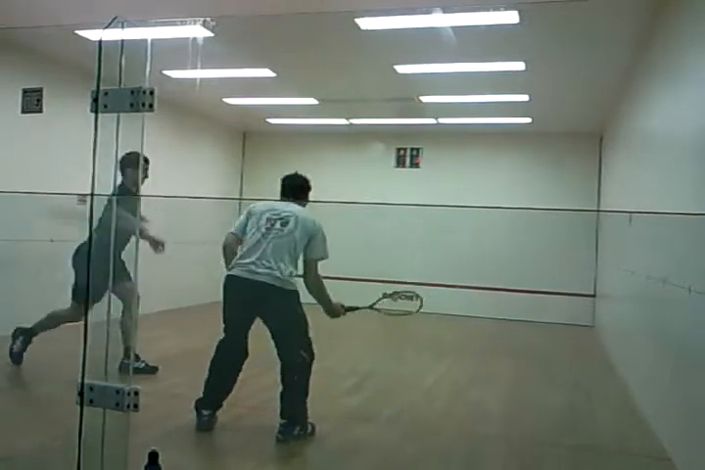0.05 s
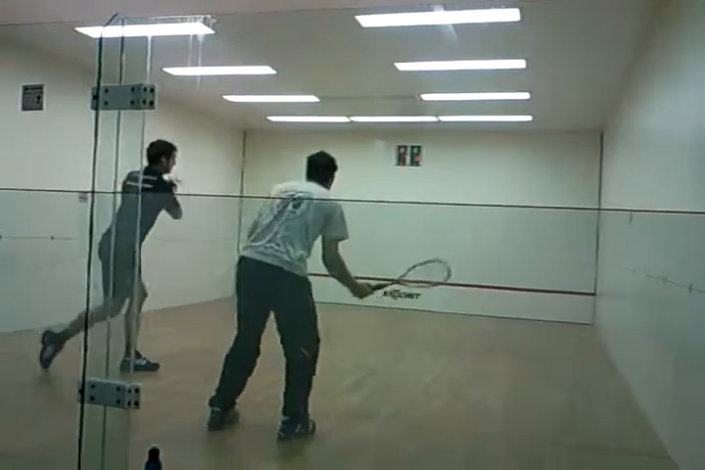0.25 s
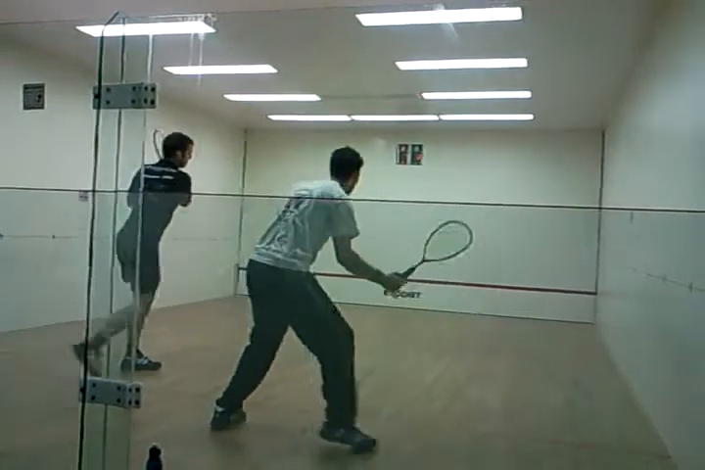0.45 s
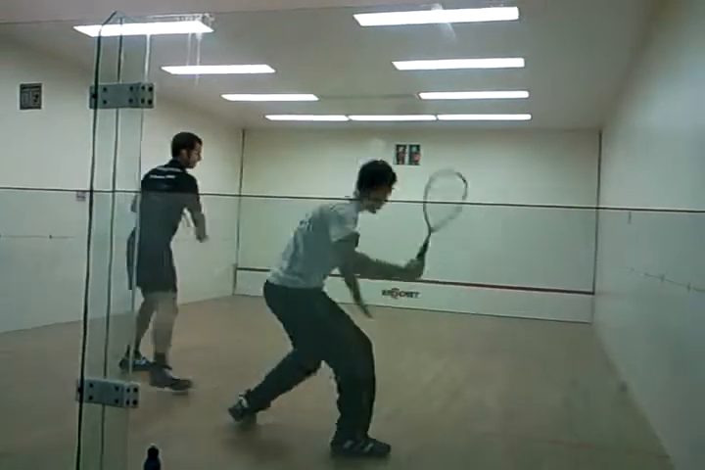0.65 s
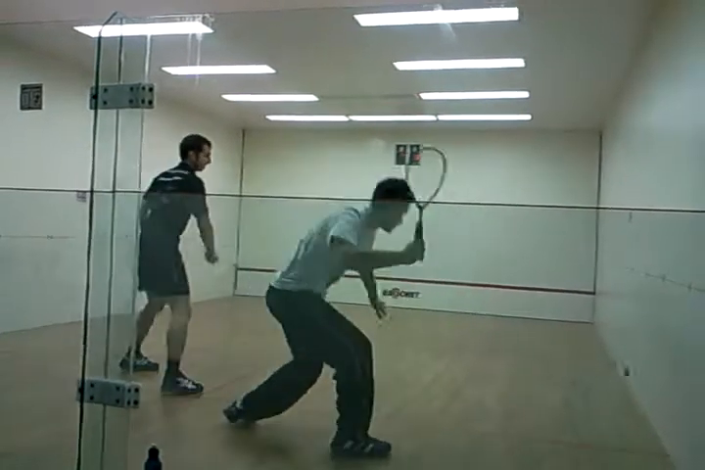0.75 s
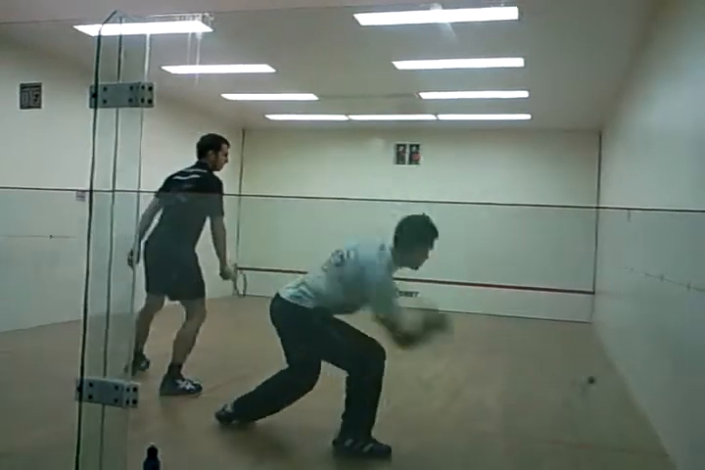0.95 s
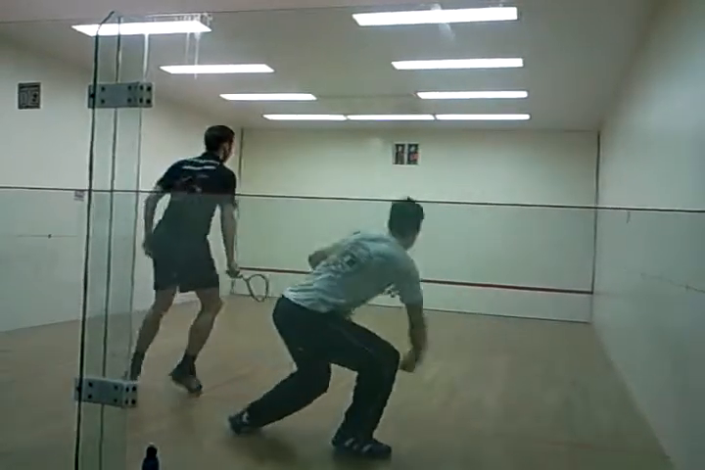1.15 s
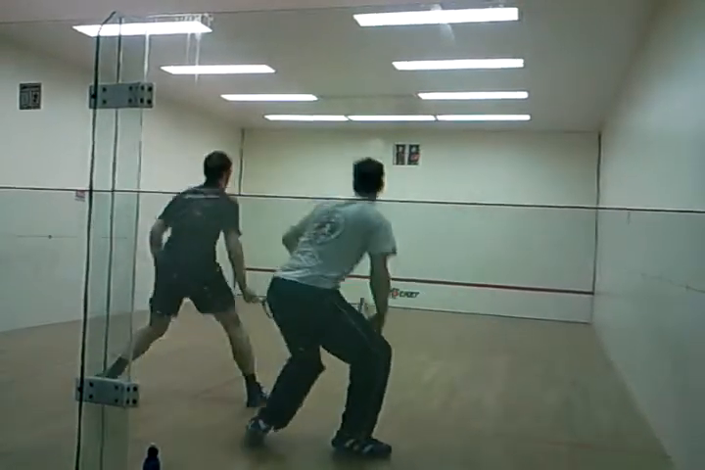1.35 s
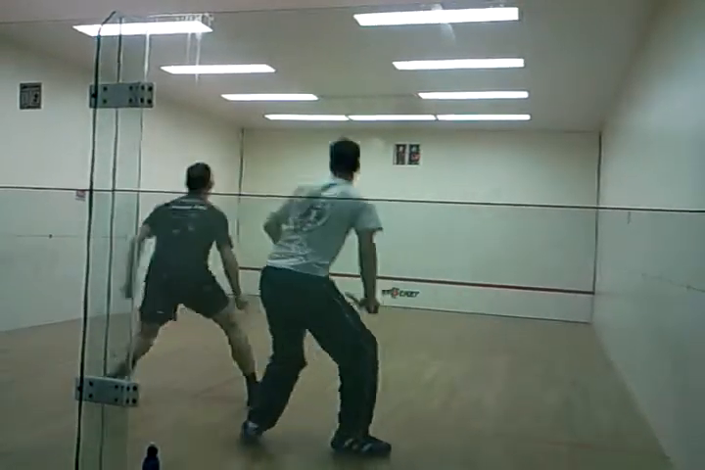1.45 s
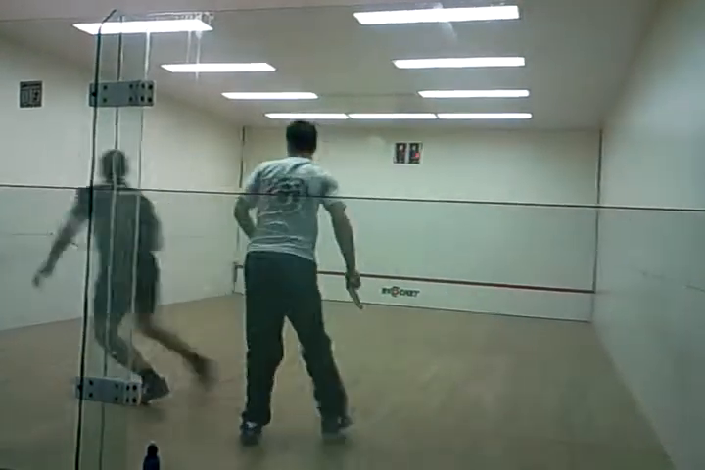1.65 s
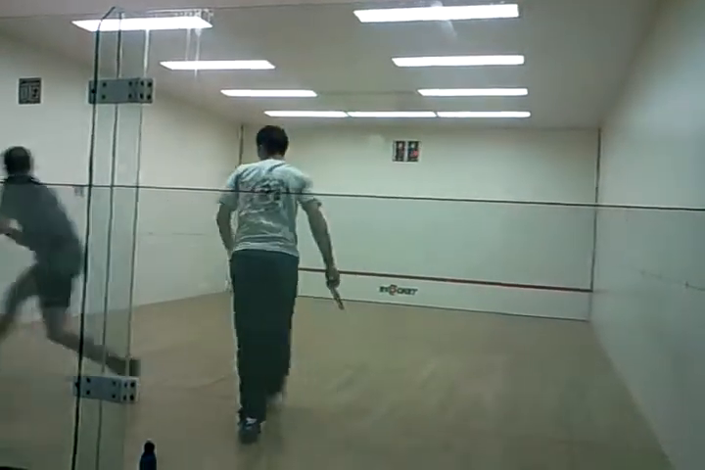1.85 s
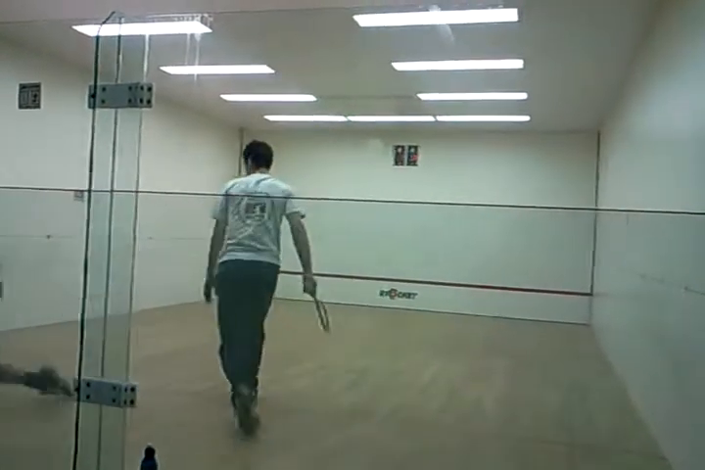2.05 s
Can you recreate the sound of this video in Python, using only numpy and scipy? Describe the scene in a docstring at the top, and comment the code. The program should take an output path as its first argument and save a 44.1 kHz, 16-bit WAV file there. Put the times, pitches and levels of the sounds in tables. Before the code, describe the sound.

Two squash shots ring through a hard-walled indoor court: racket thwack, loud slightly distorted smack on the front wall, then duller bouncing. Faint footsteps, shoe squeaks and low air noise also reach the microphone at the open back door.

```python
"""A faint shoe thump and squeak, then two squash shots, heard from a hard-walled court's open back door.
Each racket stroke is followed by a much louder smack on the front wall and a bounce on the floor.
Shoes thump and squeak on sprung boards, over a low wash of hall and air noise.
Everything rings on in the court; the wall hits overload the microphone."""
import sys
import numpy as np
from scipy import signal
from scipy.fft import rfft, irfft, next_fast_len
from scipy.io import wavfile

SR = 44100
rng = np.random.default_rng(int(sys.argv[2]) if len(sys.argv) > 2 else 0)


def int16_out(signal):
    """Quantize to a 16-bit WAV file."""
    q = np.round(np.clip(np.atleast_2d(signal).T, -1, 1) * 32767)
    wavfile.write(sys.argv[1], SR, q.astype(np.int16))


N = 92610
T = np.arange(N) / SR
FFT_SIZE = 4 * next_fast_len(N // 2 + 1, True)
HZ = np.maximum(np.fft.rfftfreq(FFT_SIZE, 1 / SR), 1)


def undb(db):
    """Decibels to gain."""
    return 10 ** (np.asarray(db) / 20)


def unit(response):
    """Response scaled to unit power."""
    return response / np.sqrt(np.mean(np.abs(response) ** 2))


def colour(points, rolloff_hz=7200):
    """Causal unit-power response through (freq_hz, level_db) points, cut above rolloff_hz."""
    hz, db = np.array(points, float).T
    gain = undb(np.interp(np.log(HZ), np.log(hz), db)) / (1 + (HZ / rolloff_hz) ** 20)
    cepstrum = irfft(np.log(gain), FFT_SIZE)[:FFT_SIZE // 2]
    cepstrum[0] = 0
    return unit(np.exp(rfft(2 * cepstrum, FFT_SIZE)))


def resonance(hz, width_hz, stages=1):
    """Response of identical damped resonators in series; width_hz is per stage."""
    return unit(1 / (1 + 1j * (HZ ** 2 - hz ** 2) / (HZ * width_hz)) ** stages)


def through(x, response):
    """Filter x by a frequency response."""
    return irfft(rfft(x, FFT_SIZE) * response, FFT_SIZE)[:N]


def lowpass(x, hz):
    """Steep treble cut."""
    return signal.sosfiltfilt(signal.ellip(8, .1, 50, hz, fs=SR, output="sos"), x)


def fade(t60_s):
    """Exponential decay, 60 dB in t60_s."""
    return np.exp(-np.log(1000) * T / t60_s)


def at(start_s, x):
    """Delay x to start_s."""
    return np.concatenate([np.zeros(int(start_s * SR)), x])[:N]


def court(direct_db, onset_db, slap_db):
    """Impulse response: direct click, slap off side walls and ceiling, fluttering tail."""
    # court reverberation: band_hz, t60_s
    decays = [(60, 2.07), (160, 1.41), (450, 2.91), (900, 2.12), (1800, 1.84), (3600, 1.51), (7500, 1.5)]
    first_echoes_per_s, mixing_s, build_s = 1800, .025, .021
    slap_s, slap_decay_s = .011, .03
    round_trip_s, flutter_db, flutter_decay_s = .0575, 3, .01
    density = np.clip(first_echoes_per_s * (1 + (T / mixing_s) ** 2) / SR, 1e-4, 1)
    chance = rng.uniform(-1, 1, N)
    echoes = np.sign(chance) * (np.abs(chance) < density) / np.sqrt(density)
    echo_spectrum = rfft(echoes, FFT_SIZE // 2)
    band_hz, band_t60_s = np.array(decays).T
    tail = np.zeros(N)
    for selector, t60_s in zip(np.eye(len(decays)), band_t60_s):
        band = np.interp(np.log(HZ[::2]), np.log(band_hz), selector)
        tail += irfft(echo_spectrum * band, FFT_SIZE // 2)[:N] * fade(t60_s)
    build = 1 + (undb(onset_db) - 1) * np.exp(-T / build_s)  # settles as the court fills
    slap = undb(slap_db) * (T > slap_s) * np.exp(-np.abs(T - slap_s) / slap_decay_s)
    flutter = undb(flutter_db * (T > round_trip_s) * np.exp(-(T % round_trip_s) / flutter_decay_s))
    return tail * (build + slap) * flutter / np.mean(flutter) + undb(direct_db) * (T == 0)


def hall_wash(level_db=-36.5):
    """Slowly fading reverberant wash of the hall."""
    # wash spectrum: freq_hz, level_db
    spectrum = [(25, -9.5), (70, -1.5), (115, -29.5), (250, -12), (480, -9), (800, -13.5), (1400, -13.5),
                (2300, -27.5), (4000, -21), (7000, -41)]
    return undb(level_db) * through(rng.standard_normal(N), colour(spectrum)) * fade(t60_s=15)


def building_air(level_db=-46.5):
    """Steady noise of air in the building."""
    # air spectrum: freq_hz, level_db
    spectrum = [(25, -4.5), (45, 11), (80, -5.5), (160, 2.5), (600, 27.5), (4000, -13)]
    return undb(level_db) * through(rng.standard_normal(N), colour(spectrum))


def boards(rise_s=.008):
    """Low boom of the panels and sprung floor."""
    # board modes: pitch_hz, level_db, t60_s
    modes = [(76.2, 2, 0.85), (131.5, -13.5, 0.86), (210.9, -14.5, 1.17)]
    boom = sum(undb(db) * np.sin(2 * np.pi * hz * T) * fade(t60_s) for hz, db, t60_s in modes)
    return np.sqrt(2) * boom * (1 - np.exp(-T / rise_s))


def footsteps():
    """Soles thump and set the boards booming."""
    # footfalls: start_s, level_db, boom_db
    steps = [(.0, -45, -1), (0.287, -41.5, -13), (1.289, -40, 5.5), (1.496, -31, 6), (1.685, -27.5, -5),
             (1.764, -32.5, 6), (1.891, -33, -6)]
    # sole thump spectrum: freq_hz, level_db
    sole = [(25, -22.5), (50, -15.5), (75, -2), (130, -1.5), (220, -10), (600, -24.5), (2000, -43),
            (7500, -28)]
    out = np.zeros(N)
    for start_s, level_db, boom_db in steps:
        thump = through(court(direct_db=13.5, onset_db=5, slap_db=-11.5) * fade(t60_s=3.3), colour(sole))
        out += undb(level_db) * at(start_s, thump + undb(boom_db) * boards())
    return out


def shoe_squeaks():
    """Rubber rubs briefly on varnish with a thin whistle, drawn out by the court."""
    # squeaks: start_s, level_db, pitch_hz, whistle_db
    squeaks = [(.0, -41.5, 4800, -6.5), (.755, -27.5, 3430, -7), (0.759, -33, 3900, -2),
               (1.168, -33, 3290, 11)]
    out = np.zeros(N)
    for start_s, level_db, pitch_hz, whistle_db in squeaks:
        rub = resonance(pitch_hz, width_hz=950, stages=2)
        whistle = undb(whistle_db) * resonance(pitch_hz, width_hz=90)
        echoes = court(direct_db=11, onset_db=-6, slap_db=-22) * fade(t60_s=3.5)
        out += undb(level_db) * at(start_s, through(echoes, unit(rub + whistle)))
    return out


def racket_strokes(pock_lag_s=.018):
    """Racket meets ball: thwack, ring of the strings, hollow pock off the near wall."""
    # strokes: start_s, level_db, ring_hz, ring_db, pock_db
    strokes = [(0.2212, -16, 515, -14, 1), (1.156, -17.5, 716, -7, -10)]
    # thwack spectrum: freq_hz, level_db
    racket = [(40, -41), (120, -17.5), (280, -11.5), (620, -9.5), (850, -6), (1450, -8), (2000, -18.5),
              (2600, -25), (4000, -25), (7500, -20.5)]
    ball = resonance(hz=890, width_hz=540, stages=2)
    out = np.zeros(N)
    for start_s, level_db, ring_hz, ring_db, pock_db in strokes:
        thwack = through(court(direct_db=13.5, onset_db=-12, slap_db=-29), colour(racket))
        ring = through(court(direct_db=18.5, onset_db=3, slap_db=-18), resonance(ring_hz, width_hz=75))
        pock = at(pock_lag_s, through(rng.standard_normal(N) * fade(t60_s=.043), ball))
        out += undb(level_db) * at(start_s, thwack + undb(ring_db) * ring + undb(pock_db) * pock)
    return out


def wall_hits(thud_rise_s=.016):
    """Ball flattens on the front wall: wall thud, ball pop, bright crack, low boom."""
    # hits: start_s, level_db, pop_hz, pop_db, pop_slap_db, crack_db, boom_db
    hits = [(0.3554, -6, 944, -2, -20, -1, -22), (1.3446, -11, 833, -4.5, 5.5, 0.5, -16)]
    # wall thud spectrum: freq_hz, level_db
    wall = [(30, -8), (50, -13), (70, -12), (130, 3.5), (165, 0.5), (215, 2), (350, -4.5), (700, 0),
            (1500, 1), (2300, -5.5), (3500, -6), (7500, -10.5)]
    # crack spectrum: freq_hz, level_db
    crack_spectrum = [(300, -44), (1200, -31.5), (2500, 3), (5000, -9.5), (7500, 10)]
    thud_rise = 1 - np.exp(-T / thud_rise_s)  # the thud takes time to fill the court
    out = np.zeros(N)
    for start_s, level_db, pop_hz, pop_db, pop_slap_db, crack_db, boom_db in hits:
        thud = through(court(direct_db=-8, onset_db=2.5, slap_db=-12) * thud_rise, colour(wall))
        ball = resonance(pop_hz, width_hz=388, stages=2)
        pop = through(court(direct_db=16, onset_db=-7, slap_db=pop_slap_db), ball)
        burst = court(direct_db=-11, onset_db=-1, slap_db=2.5) * fade(t60_s=.15)
        crack = through(burst, colour(crack_spectrum))
        smack = thud + undb(pop_db) * pop + undb(crack_db) * crack + undb(boom_db) * boards()
        out += undb(level_db) * at(start_s, smack)
    return out


def ball_bounces():
    """Ball on floor and side walls: softer, duller pops, nearer the door."""
    # bounces: start_s, level_db, pop_hz
    bounces = [(.761, -32, 907), (1.43, -23.5, 560), (1.482, -26.5, 850), (1.706, -30, 880)]
    out = np.zeros(N)
    for start_s, level_db, pop_hz in bounces:
        ball = resonance(pop_hz, width_hz=582, stages=2)
        pop = through(court(direct_db=29, onset_db=10.5, slap_db=-1), ball)
        out += undb(level_db) * at(start_s, pop)
    return out


def scene():
    """Rally and footwork over the background, mono."""
    background = hall_wash() + building_air()
    rally = racket_strokes() + wall_hits() + ball_bounces()
    footwork = footsteps() + shoe_squeaks()
    return (background + rally + footwork)[None]


def record(dry):
    """Microphone overloads, its narrow channel cuts the treble, remaining peaks clip."""
    overload, ceiling = .76, .72
    saturated = dry / (1 + (np.abs(dry) / overload) ** 10) ** (1 / 10)
    clipped = np.clip(lowpass(saturated, hz=7800), -ceiling, ceiling)
    return lowpass(clipped, hz=16000)


dry = scene()
out = record(dry)
int16_out(out)
```